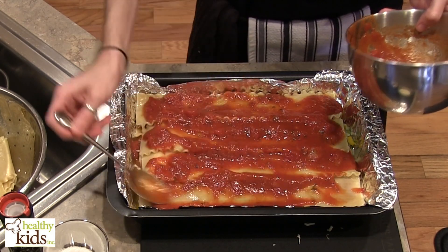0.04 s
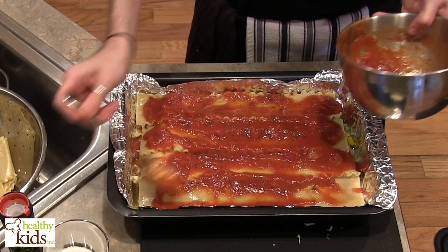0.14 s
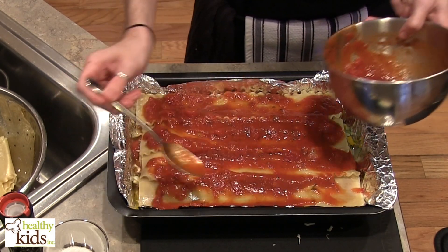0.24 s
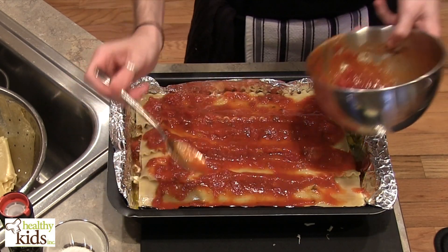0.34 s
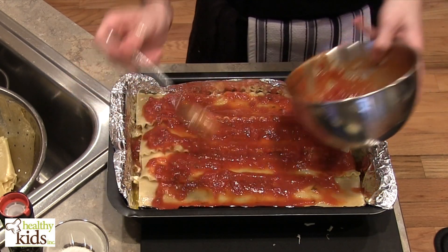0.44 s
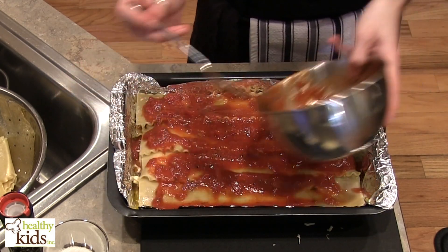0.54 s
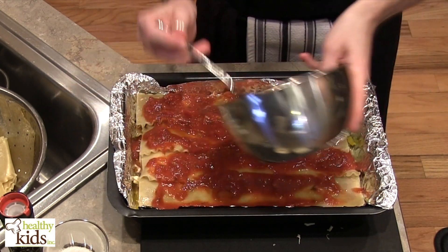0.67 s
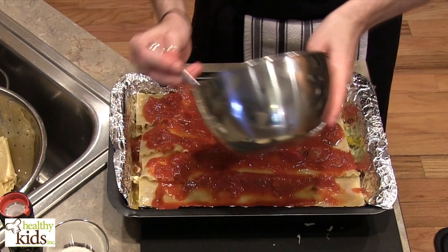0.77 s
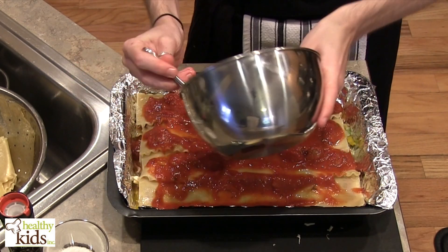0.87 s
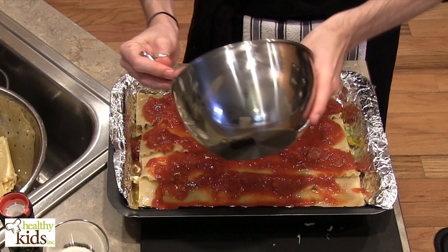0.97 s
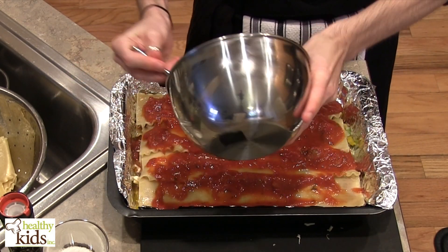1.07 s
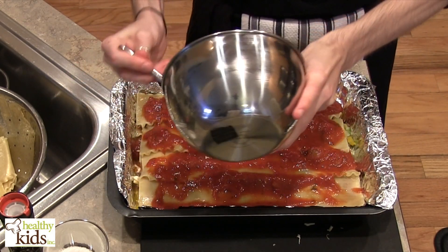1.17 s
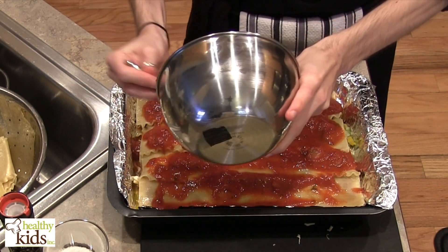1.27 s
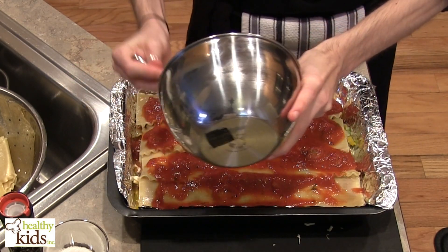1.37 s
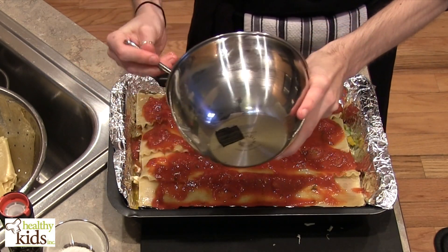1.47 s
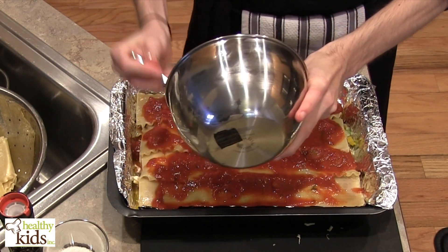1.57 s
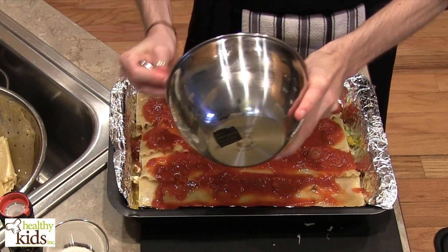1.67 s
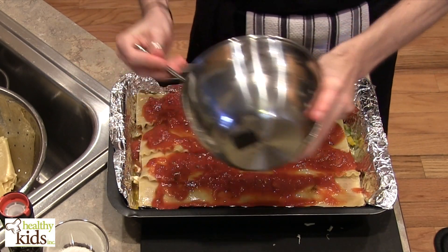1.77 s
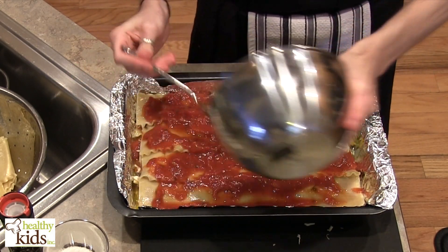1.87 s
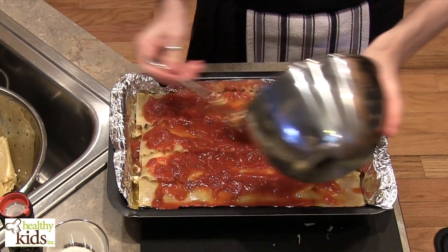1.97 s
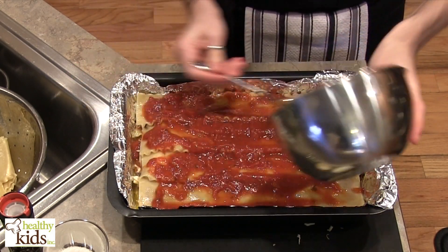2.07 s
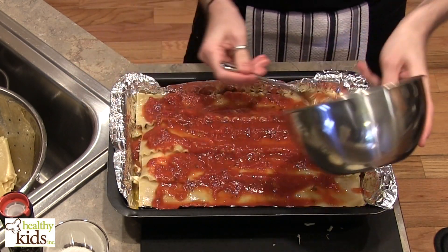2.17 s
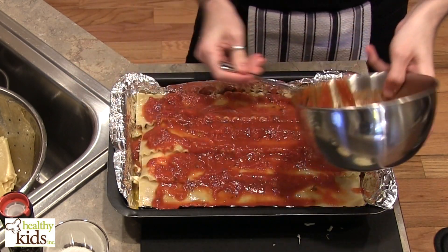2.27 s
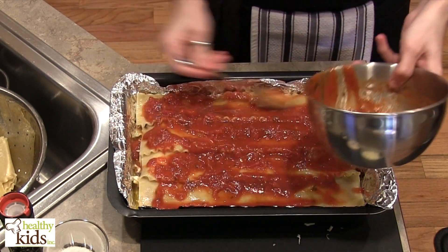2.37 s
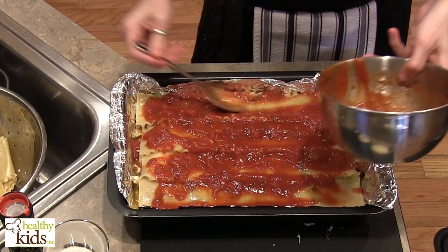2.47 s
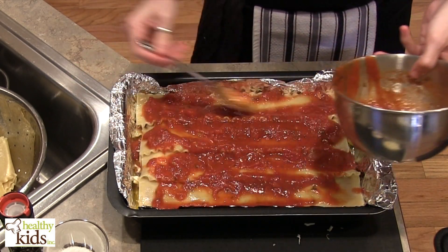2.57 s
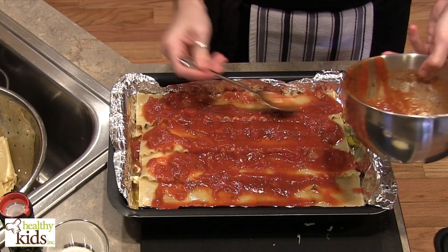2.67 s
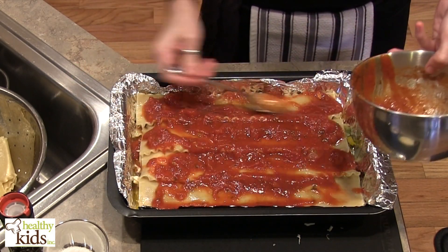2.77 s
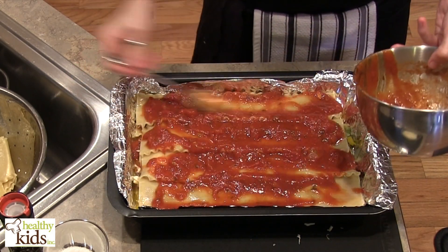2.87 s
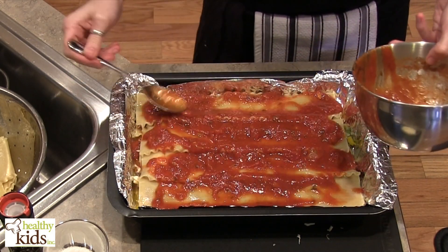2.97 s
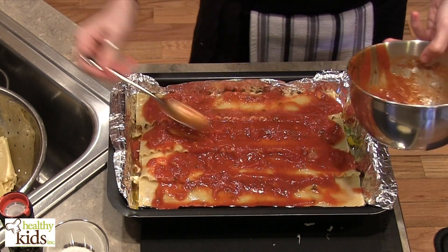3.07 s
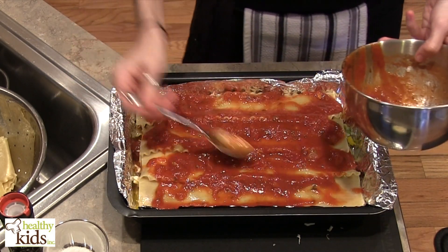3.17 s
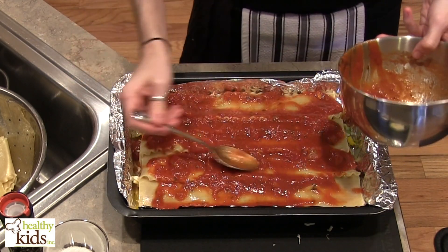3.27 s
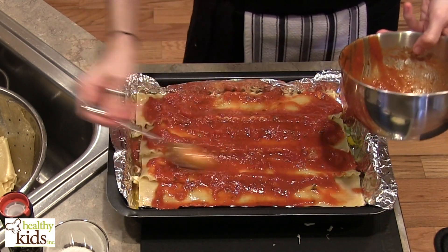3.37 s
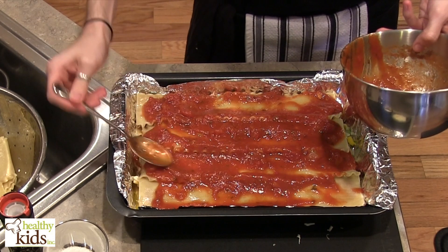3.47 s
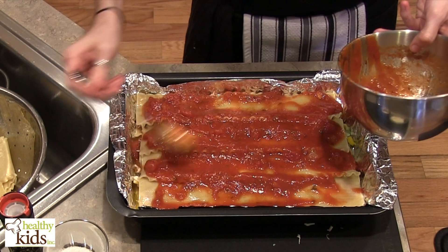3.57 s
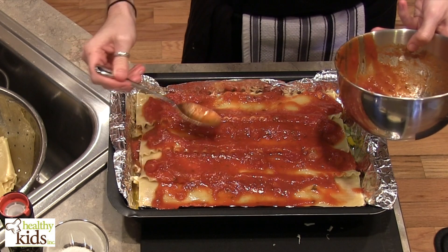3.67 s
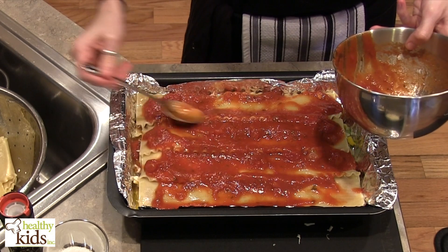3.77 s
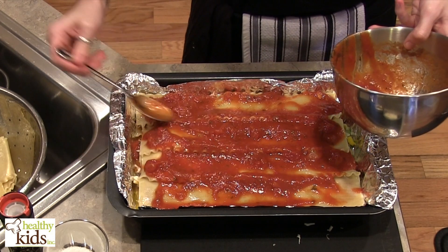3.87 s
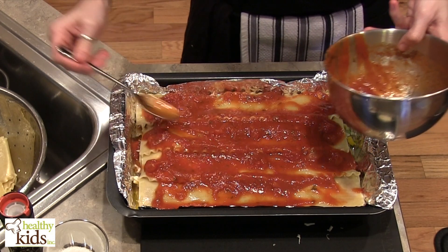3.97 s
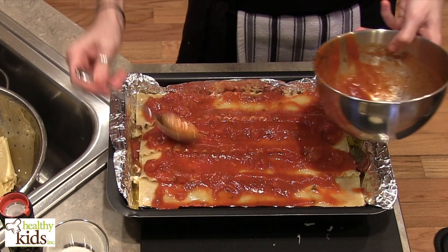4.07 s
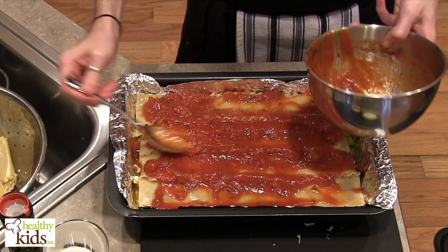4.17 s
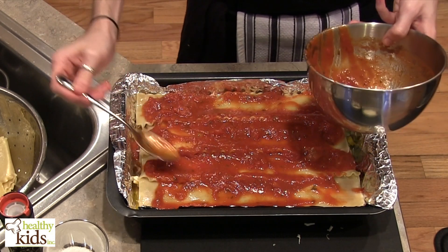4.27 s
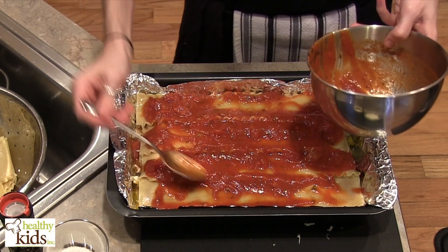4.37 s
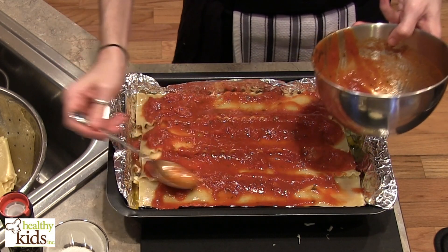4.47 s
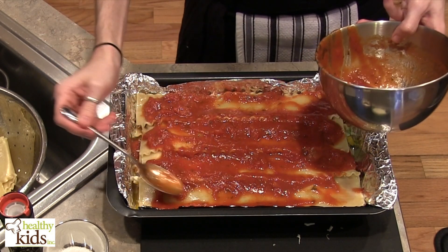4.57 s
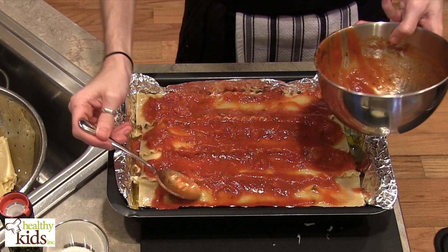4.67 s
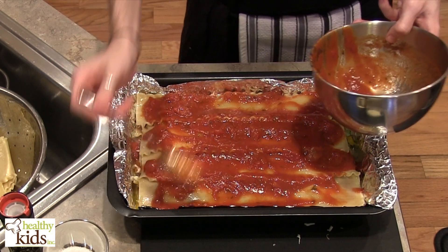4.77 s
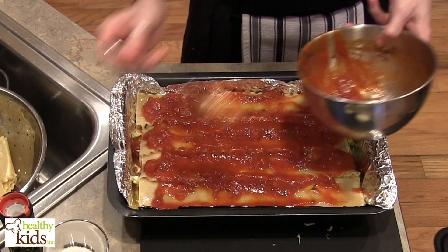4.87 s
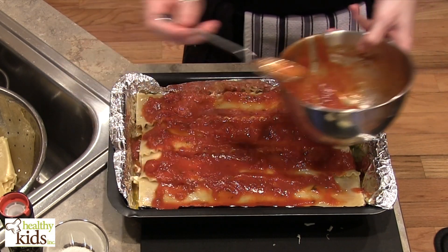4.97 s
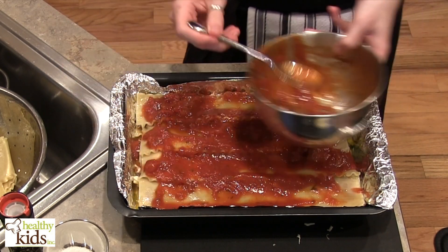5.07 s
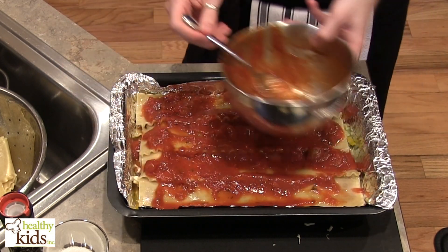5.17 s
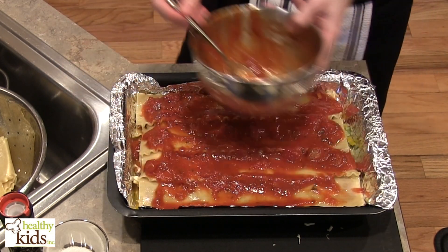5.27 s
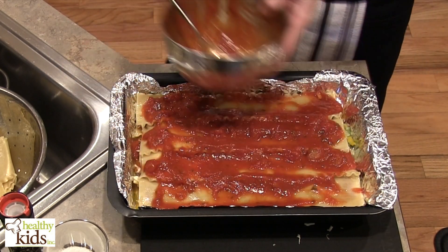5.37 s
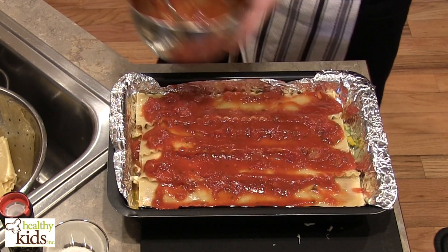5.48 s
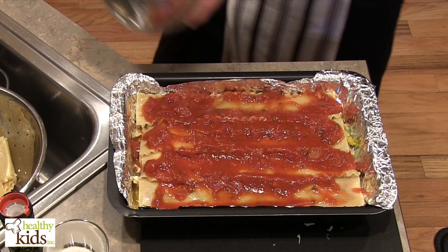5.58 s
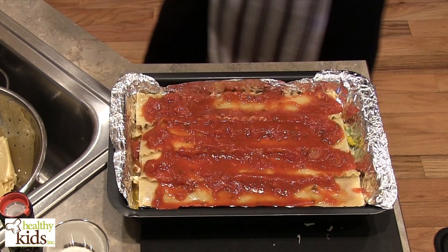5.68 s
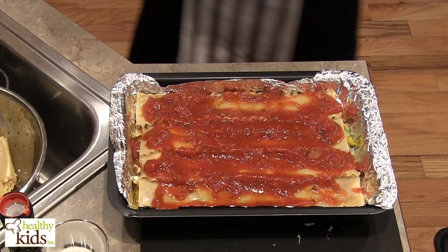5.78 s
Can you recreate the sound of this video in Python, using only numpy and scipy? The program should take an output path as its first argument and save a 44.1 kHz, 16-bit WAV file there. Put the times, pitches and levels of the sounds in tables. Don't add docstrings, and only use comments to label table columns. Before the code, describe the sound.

A metal spoon knocks and scrapes a ringing steel bowl in a quiet kitchen, pauses with a foil snap, then clanks again at the end.

```python
import sys
import numpy as np
from scipy import signal
from scipy.fft import rfft, irfft
from scipy.io import wavfile

SR = 44100
rng = np.random.default_rng(int(sys.argv[2]) if len(sys.argv) > 2 else 0)


def rack_gain(trim_db):
    fader = np.asarray(trim_db, float)
    return 10 ** (fader / 20)


def wav_record(signal):
    frames = np.transpose(np.atleast_2d(signal))
    bounded = np.clip(frames, -1, 1)
    quanta = np.round(bounded * 32767).astype(np.int16)
    wavfile.write(sys.argv[1], SR, quanta)


N = 257181


def evened(x):
    return x / np.sqrt(np.mean(x ** 2) + 1e-20)


def read(points, hz):
    f, value = np.transpose(points)
    return np.interp(np.log(hz + 1), np.log(f + 1), value)


def add(mix, s, sound):
    part = mix[round(s * SR):][:len(sound)]
    part += sound[:len(part)]


def coloured(x, points):
    gain = rack_gain(read(points, np.fft.rfftfreq(x.shape[-1], 1 / SR)))
    return irfft(rfft(x) * evened(gain), x.shape[-1])


def burst(points, t60, rise=0.0022):
    t = np.arange(SR // 4) / SR
    fall = rack_gain(-60 * t / t60)
    return coloured(rng.standard_normal(len(t)), points) * fall * (1 - np.exp(-t / rise))


# frequency [Hz], level [dB per Hz].
AIR = [(15, -68), (25, -53), (45, -13.5), (108, -14), (170, -8), (200, -7.5), (326, -6.5), (463, -6.5),
       (641, -6.5), (734, -7), (936, -11.5), (1020, -9.5), (5000, -19), (13600, -30), (16000, -36)]


def air_hiss():
    same = 0.89
    noise = rng.standard_normal((3, N))
    return rack_gain(-66) * coloured(same * noise[0] + np.sqrt(1 - same ** 2) * noise[1:], AIR)


# frequency [Hz], level [dB rms].
HUM = [(96.9, -88), (118.4, -87), (204.6, -83)]


def fridge_hum():
    t = np.arange(N) / SR
    return sum(rack_gain(db + 5.5) * np.sin(2 * np.pi * (hz * t + rng.random())) for hz, db in HUM)


def pipe_drone():
    centre_hz, width_hz = 362, 59
    stop_s, start_s, fade_s = 1.99, 5.03, 0.26
    t = np.arange(N) / SR
    drone = signal.lfilter(*signal.iirpeak(centre_hz, centre_hz / width_hz, SR), rng.standard_normal(N))
    pause = np.clip(np.minimum(t - stop_s, start_s - t) / fade_s + 0.5, 0, 1)
    return rack_gain(-62 - 8.0 - 10.5 * pause) * evened(drone)


# start [s], peak level [dB], centre frequency [Hz], width [octaves], time to fall 60 dB [s].
TOUCHES = [(0.029, -48.5, 5960, 1.6, 0.021), (2.04, -50, 7500, 0.58, 0.036),
           (2.379, -54, 7970, 0.63, 0.019), (2.58, -51.5, 7040, 1.2, 0.019),
           (3.372, -55, 4540, 1.03, 0.0078), (3.376, -39, 1310, 1.85, 0.023), (3.427, -49, 8500, .8, 0.033),
           (3.445, -52, 7900, 0.74, 0.0093), (5.15, -51.5, 904, 2.3, 0.15),
           (5.185, -51.5, 1480, 1.8, 0.052), (5.23, -53, 980, 2.8, 0.3), (5.24, -43.5, 4520, 1.4, 0.016),
           (5.271, -51, 1580, 2.1, 0.13), (5.286, -42, 4130, 1.7, 0.032), (5.309, -54.5, 1960, 0.94, 0.17)]


def light_touches():
    out = np.zeros(N)
    for s, db, hz, octaves, t60 in TOUCHES:
        peak = [(hz / 4 ** octaves, -30), (hz, 0), (hz * 4 ** octaves, -45)]
        add(out, s, rack_gain(db - 6.0) * burst(peak, t60))
    return out


CLOCK_DB = [-52, -43, -51, -56.5, -56, -53]
# frequency [Hz], level [dB per Hz].
CLOCK = [(820, -43.5), (1400, -17), (1660, -2.5), (1800, -2.5), (2030, -9), (2380, 2), (2500, -1),
         (2810, -20), (3200, -25.5), (4160, -49), (7040, -120)]


def wall_clock():
    out, first_tick_s = np.zeros(N), 0.7934
    for second, db in enumerate(CLOCK_DB):
        add(out, first_tick_s + second, rack_gain(db) * burst(CLOCK, 0.13, rise=0.005))
    return out


def ring(modes, colour=((1, 0), (2, 0)), rise=0.0036):
    hz, db, t60 = np.transpose(modes)[:, :, None]
    t = np.arange(SR // 2) / SR
    spot, twin, phase = rng.standard_normal((3, len(modes), 1))
    fall_db = 60 * t / np.clip(t60, 0.03, 0.45)
    held = 0.87 * rack_gain(-1.2 * fall_db)
    twin_hz = hz + 9.76 * twin
    pair = np.sin(2 * np.pi * hz * t) + held * np.sin(2 * np.pi * twin_hz * t + 0.3 * phase)
    level_db = db - db.max() + read(colour, hz) - 0.3 * spot
    return (rack_gain(level_db - fall_db) * pair).sum(0) * (1 - np.exp(-t / rise))


# frequency [Hz], level [dB], time to fall 60 dB [s].
RAISED = [(682, -14.5, 0.11), (761, -10.5, .3), (805, -3, 0.2), (927.3, -12.5, .3), (1183, -12.5, 0.1),
          (1516, -14.5, .2), (1654, -14.5, .22), (2197, -23, 0.39), (2358, -14, 0.39), (3094, -14.5, .3),
          (3850, -11, 0.054), (4110, -6, .12), (5400, -8, .1), (6910, -18, 0.09)]
TIPPED = [(711, -12, .3), (741, -13, .25), (826, -11, .22), (867, 0, .43), (1272, -15, .2),
          (1803, -20, .45), (2379, -14, .33), (2515, -11, .31), (3230, -22, .22), (4226, -22, .45),
          (4727, -28, .4), (5534, -28, .3), (6223, -24, .35), (6304, -25, .35)]
TIPPED_LOW = [(683, -9, .28), (772, -13, .22), (867, 0, .39), (1502, -17, .2), (1588, -13, .3),
              (1658, -17, .35), (1762, -17, .3), (2207, -26, .3), (3009, -20, .15), (3408, -29, .4),
              (4237, -30, .15), (6438, -18, .1), (6643, -25, .29)]
TIPPED_EDGE = [(702, -13, .2), (872, 0, .42), (1282, -22, .5), (1450, -12, .12), (1585, -11, .3),
               (1735, -13, .25), (1804, -14, .3), (2137, -25, .3), (3100, -19, .22), (3483, -24, .4),
               (4240, -18, .15), (4750, -22, .2)]
UPRIGHT = [(688, -3, 0.22), (792, -8, 0.15), (835, 2, 0.24), (847, -1.5, .44), (1178, -5.5, 0.31),
           (1277, -4, 0.28), (1611, -5, 0.3), (1800, -19, 0.11), (2520, -13, 0.23), (3170, -9.5, .22),
           (3660, -3.5, 0.029), (4193, -10.5, 0.1), (4760, -11, 0.077), (8630, -7.5, 0.052)]
CARRIED = [(682, -2, .26), (750, -10, .3), (868, 0, .38), (1230, -12, .2), (1286, -14, .3), (1680, -8, .12),
           (1788, -12, .33), (2495, -12, .2), (2895, -15, .2), (3397, -15, .25), (4280, -22, .4),
           (4790, -6, .36), (5970, -25, .28)]
# start [s], the tones that ring from then on.
GRIPS = [
    (.88, RAISED),
    (1.01, TIPPED),
    (1.41, TIPPED_LOW),
    (1.75, TIPPED_EDGE),
    (5.36, UPRIGHT),
    (5.65, CARRIED),
]


def grip(s):
    return [row for row in GRIPS if row[0] <= s][-1]


def crowd(points, t60, rise=0.0015):
    x = burst(points, t60, rise)
    return x / np.linalg.norm(x)


def click(points):
    return coloured(np.eye(1, 128, 64)[0], points)


# frequency [Hz], level [dB per Hz].
SHEEN = [(1940, -34.5), (3300, -3.5), (4010, -22.5), (4350, -10.5), (4440, -1), (4820, -31.5),
         (5300, -25.5), (6270, 0.5), (7230, 8.5), (8790, 12), (14500, -21.5), (16600, -31)]
BODY = [(180, -65), (300, -36.5), (508, -33), (824, 3.5), (1020, -13.5), (1230, 3.5), (1380, -36.5),
        (1730, 5), (1990, -14), (3050, -9.5), (4810, -14), (5240, -19.5), (9000, -41), (11700, -68.5),
        (19800, -120)]
FIZZ = [(2500, -23), (5000, -11), (12500, 4), (16000, -7.5)]


def scrape(start, lift, skid_db, flick_db, bright_db):
    t = np.arange(SR // 4) / SR
    after = t - (lift - start)
    chatter = evened(rng.standard_normal(len(t)) * rack_gain(2.8 * np.minimum(rng.exponential(1, len(t)), 4)))
    clumps = np.interp(t, np.arange(100) * 0.0054, rng.standard_normal(100))
    chatter *= rack_gain(4 * clumps)
    chatter *= 1 - np.exp(-t / 0.004)
    chatter *= rack_gain(-543 * np.maximum(after, 0))
    skid = rack_gain(skid_db - 190 * t)
    flick = rack_gain(flick_db + 168.5 * np.minimum(after, 0))
    shell = ring(grip(start)[1])
    out = np.zeros(SR)
    add(out, 0, rack_gain(skid_db + bright_db + 25) * crowd(SHEEN, 0.079))
    # level in dB, extra dB for the flick, what is set ringing
    layers = ((bright_db - 5.5, 3, click(SHEEN)),
              (-12.5, 0, shell / np.linalg.norm(shell)),
              (-8.5, -1.5, crowd(BODY, 0.058)),
              (bright_db - 17, 8, click(FIZZ)))
    for db, extra_db, ringing in layers:
        push = chatter * rack_gain(db) * np.hypot(skid, rack_gain(extra_db) * flick)
        add(out, 0, signal.fftconvolve(push, ringing))
    return out


def radiated(x):
    t = np.arange(N) / SR
    shell = signal.sosfilt(signal.butter(10, 625, "high", fs=SR, output="sos"), x)
    tipped = signal.lfilter(*signal.butter(2, [230, 650], "band", fs=SR), x)
    upright = signal.lfilter(*signal.butter(2, [190, 341.4], "band", fs=SR), x)
    is_tipped = (t > 1.01) & (t < 2.6)
    return shell + np.where(is_tipped, rack_gain(-5) * tipped, rack_gain(-8) * upright)


# start [s], peak level [dB], then relative to it belly ring [dB],
# rim ring [dB] and dry crack [dB].
BLOWS = [(0.8872, -19, 5, -7, 9.5), (0.9070, -29, -3.5, 12, 9), (0.922, -21, 3, -18, 8),
         (0.972, -31.5, -1, -6, 9), (1.0205, -14.5, 1, -1, -0.5), (1.4172, -19.5, 0, -5, 0.5),
         (1.514, -40.5, -28, -10, 6.5), (1.7609, -24, -5, -31, -4), (1.849, -35.5, -29.5, -2, 6.5),
         (5.37, -19, -12.5, 5, 6.5), (5.4386, -21, -3, -19, 5.5), (5.5751, -35.5, -1.5, -12, 6.5),
         (5.6622, -27, 5, 1.5, 8.5), (5.7030, -35.5, 1, -5, 19.5), (5.742, -37, 3, -16, 10)]
# frequency [Hz], level [dB per Hz].
CRACK = [(88, -72.5), (150, -30.5), (411, -7.5), (686, -5), (836, 12.5), (1060, -18.5), (1700, -3.5),
         (2110, -22.5), (2430, -14), (2730, -18), (4220, -16.5), (6260, -23), (8420, -21.5), (14300, -30.5),
         (16800, -48.5)]
# start [s], lift [s], skid level [dB], flick level [dB], brightness [dB].
STROKES = [
    (0.889, 0.987, -15.5, -23, -13.5),
    (1.022, 1.156, -31.5, -36, 3),
    (1.42, 1.518, -30.5, -42, 4),
    (1.763, 1.852, -39.5, -42.5, 7),
    (5.373, 5.432, -16.5, -53, -15.5),
    (5.46, 5.553, -44, -33, -19.5),
    (5.664, 5.675, -18, -18.5, -19),
]


def bowl():
    tones, clatter = np.zeros((2, N))
    for s, db, belly_db, rim_db, crack_db in BLOWS:
        start, modes = grip(s)
        first = s - start < 0.015
        rise = 0.0007 if first else 0.009
        colour = [(950, belly_db), (1150, 0), (3300, 0.017), (3800, rim_db + 7.0)]
        crack = CRACK
        if not first:
            crack = [(hz, level + read(colour, hz)) for hz, level in CRACK]
        add(tones, s, rack_gain(db - 4.5) * ring(modes, colour, rise=2 * rise))
        add(clatter, s, rack_gain(db + crack_db + 1.0) * burst(crack, 0.037 + 4 * rise, rise))
    for row in STROKES:
        add(clatter, row[0], scrape(*row))
    return radiated(tones), radiated(clatter)


# centre time [s], peak level [dB], frequency [Hz].
THUMPS = [
    (0.889, -55, 70),
    (0.91, -46, 310),
    (1.022, -38, 525),
    (1.421, -36.5, 627),
    (1.764, -40, 580),
    (5.375, -67, 210),
    (5.455, -49, 247),
    (5.672, -54, 290),
]


def thumps():
    out, t = np.zeros(N), np.arange(-800, 800) / SR
    width_s = np.where(t < 0, 0.58 * 0.006, 0.006)
    for s, db, hz in THUMPS:
        add(out, s - 800 / SR, rack_gain(db) * np.exp(-(t / width_s) ** 2) * np.cos(2 * np.pi * hz * t))
    return signal.lfilter(*signal.butter(1, 25, "high", fs=SR), out)


# frequency [Hz], level [dB per Hz].
SNAP = [(180, -43), (330, -15), (450, -3.5), (900, -14.5), (2450, -6), (4120, -11.5), (7000, -7.5),
        (12900, -13.5), (16600, -38)]


def foil_snap():
    out, s, db, t60 = np.zeros(N), 2.7338, -28, 0.037
    add(out, s, rack_gain(db) * burst(SNAP, t60, rise=0.0024))
    add(out, s + 0.008, rack_gain(db - 6) * burst(SNAP, t60, rise=0.0035))
    return out


# frequency [Hz], time to fall 60 dB [s].
KITCHEN = [(200, 1), (700, 0.35), (2000, 0.47), (5000, 0.37), (9000, 0.33), (15000, 0.25)]


def kitchen(x):
    same = 0.87
    taps = np.zeros((3, SR))
    at = np.arange(120, SR - 20, 20) + rng.integers(0, 20, (3, (SR - 121) // 20))
    np.put_along_axis(taps, at, rng.choice([-1., 1.], at.shape), 1)
    sides = same * taps[0] + np.sqrt(1 - same ** 2) * taps[1:]
    hz, t, z = signal.stft(sides, SR, nperseg=256)
    tail = signal.istft(z * rack_gain(-60 * t / read(KITCHEN, hz)[:, None]), SR, nperseg=256)[1]
    return signal.fftconvolve(x[None], tail / np.linalg.norm(tail[0]), axes=1)[:, :N]


def scene():
    air = air_hiss() + fridge_hum() + pipe_drone()
    small = light_touches() + wall_clock() + foil_snap()
    tones, clatter = bowl()
    room = kitchen(rack_gain(-10) * tones + rack_gain(-3.0) * clatter + rack_gain(0.5) * small)
    return rack_gain(-1.5) * tones + rack_gain(-0.5) * clatter + small + thumps() + room + air


def roll_off(x):
    return signal.sosfilt(signal.butter(12, 17760, fs=SR, output="sos"), x)


def record(dry):
    edge = signal.firwin(255, 16750, window=("kaiser", 9), fs=SR)[None]
    left_right_db = np.array([[3], [-4.5]])
    mix = signal.oaconvolve(dry, edge, "same") * rack_gain(left_right_db)
    return roll_off(mix)


dry = scene()
out = record(dry)
wav_record(out)
```